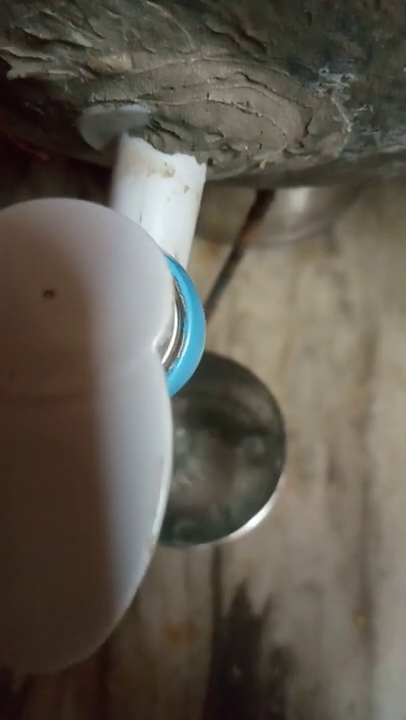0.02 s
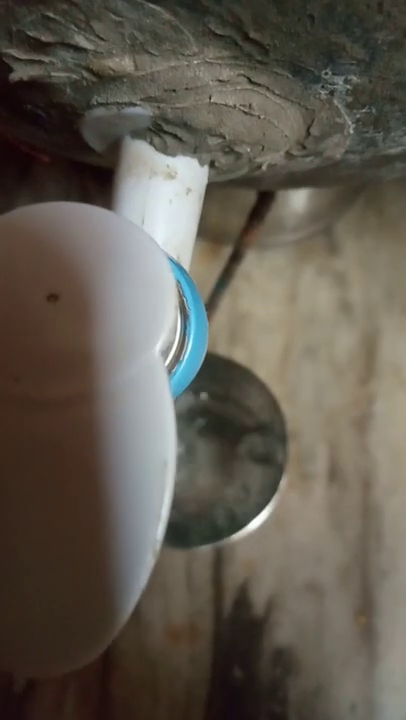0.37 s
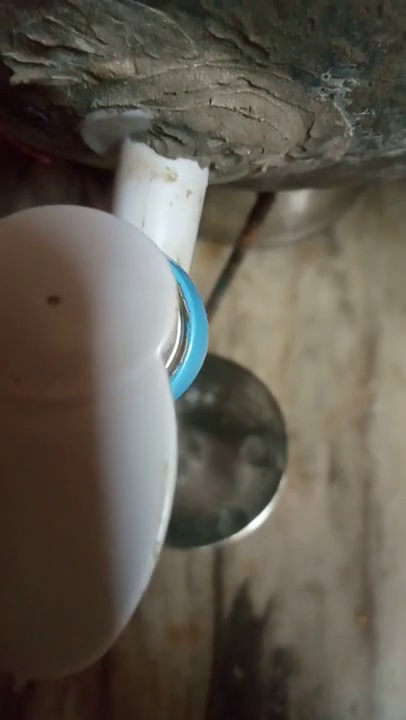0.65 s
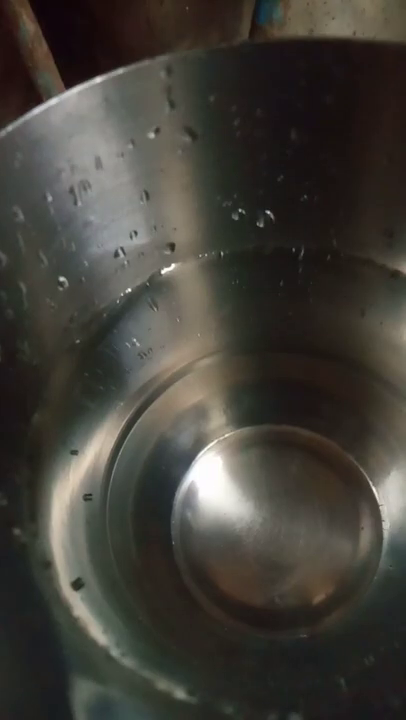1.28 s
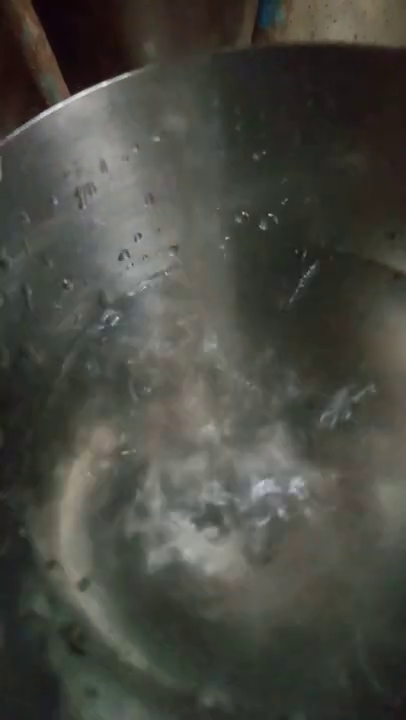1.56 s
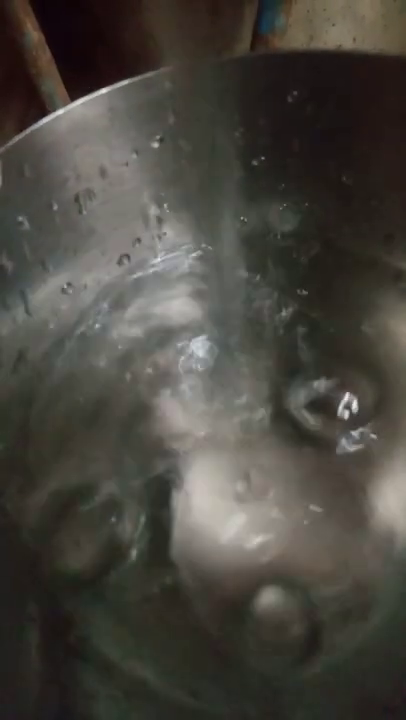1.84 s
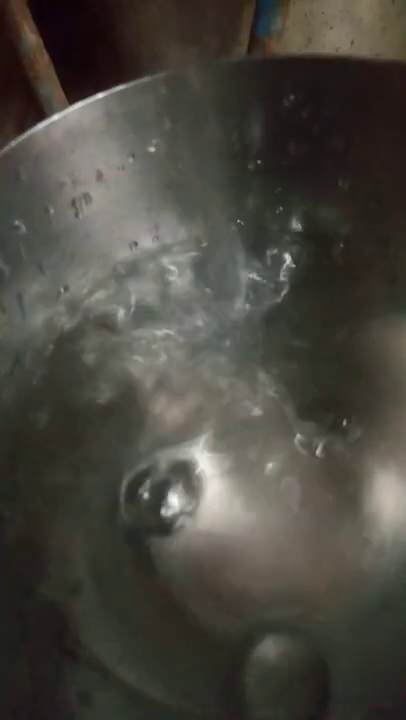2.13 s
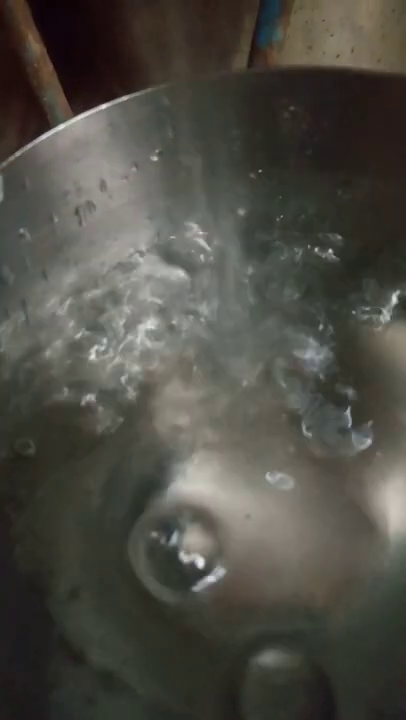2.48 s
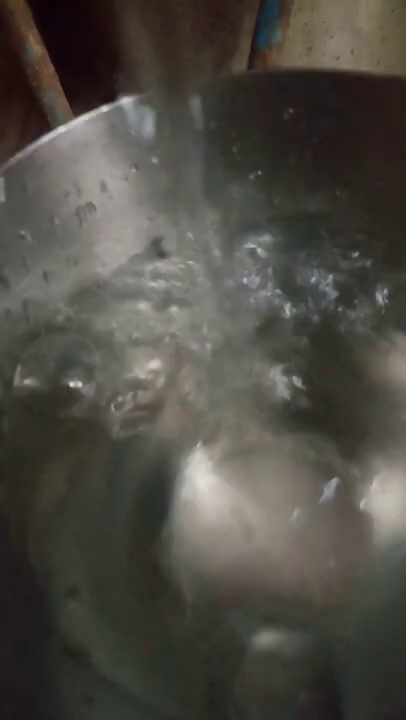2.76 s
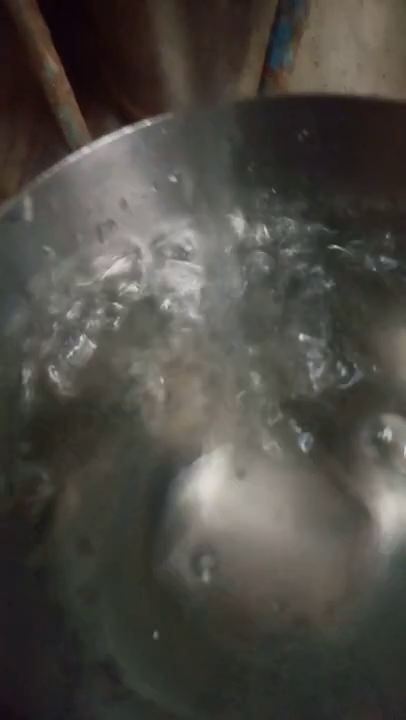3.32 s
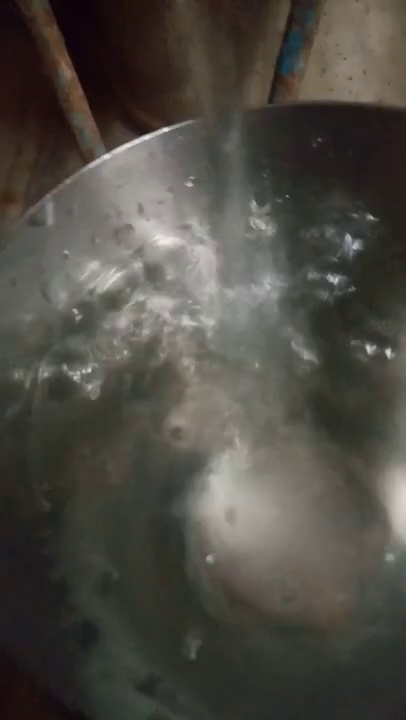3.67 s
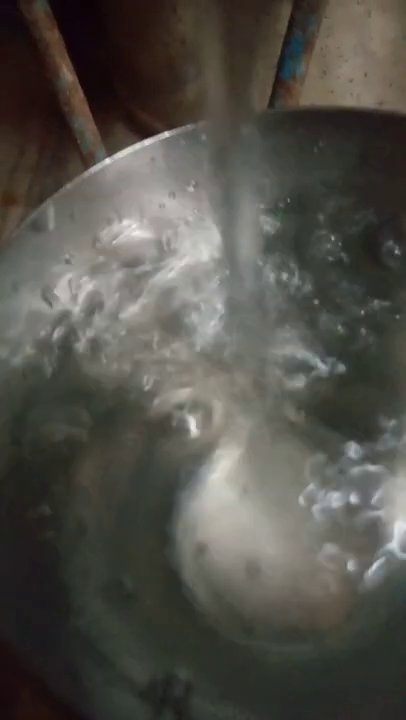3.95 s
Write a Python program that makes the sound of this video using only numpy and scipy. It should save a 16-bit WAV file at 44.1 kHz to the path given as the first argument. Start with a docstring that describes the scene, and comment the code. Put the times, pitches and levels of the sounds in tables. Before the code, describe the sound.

Close by, a stream of water fills a metal cup with a bright, bubbly sound, cuts off for an instant, then plunges into a larger metal pot, where it rumbles hollowly with plinks, gulps and ticking drops.

```python
"""Tap water filling steel vessels

Water runs from a filter tap into a steel tumbler; after an abrupt cut, it pours into a wide steel pot.
The jet drags under a swarm of air bubbles that ring briefly and rise in pitch, and each vessel
colours them with its resonances. Single bubbles plink above the churn, big air pockets gulp,
lumps of water slap, and flung drops tick on the steel over a fine spray."""
import sys
import numpy as np
from scipy import signal
from scipy.fft import rfft, irfft
from scipy.io import wavfile
from scipy.ndimage import uniform_filter1d, map_coordinates

SR = 44100
rng = np.random.default_rng(int(sys.argv[2]) if len(sys.argv) > 2 else 0)


def to_wav(sig):
    """Store sig (one row per channel, or 1-D mono) as 16-bit WAV at the path in sys.argv[1].

    Samples outside -1..1 are clipped; the rate is SR.
    """
    pcm = np.clip(np.atleast_2d(sig), -1, 1) * 32767
    pcm = np.round(pcm).astype(np.int16)
    wavfile.write(sys.argv[1], SR, pcm.T)  # frames by channels


N = 176400  # 4 seconds

# tone of the churning water in each vessel, and a further softening of its top hiss (f/Hz, gain/dB)
TUMBLER_COLOUR = [(25, -31.5), (55, -8.5), (110, -5.5), (200, -3), (450, -2.5), (750, -1), (1050, -5),
                  (1350, -1.5), (1700, -4), (2400, -11), (3100, -16), (3950, -18), (4800, -30), (5400, -43),
                  (7100, -40.5), (8500, -60)]
POT_COLOUR = [(25, -30), (55, -9), (110, -2.5), (220, -5), (400, 0.5), (600, -2.5), (1100, -9.5),
              (1500, -7.5), (2000, -10.5), (2450, -14.5), (2900, -18), (3950, -24.5), (4900, -34.5),
              (5400, -46), (7100, -50), (8500, -65)]
HISS_ROLLOFF = [(8500, 0), (15000, -3)]
# resonances: the pitches at which each vessel and its air like to ring (f/Hz, width/Hz, gain/dB)
TUMBLER_MODES = [(114, 17, 4), (182.5, 25, 1), (280.7, 7.9, 8), (389, 4.8, 10.5), (491, 15, 0),
                 (774, 24, -6), (840, 9, -6.5), (913, 19, 5), (1220, 58, -3), (1345, 20, -5),
                 (1400, 30, 1.5), (1580, 21, 0), (1630, 16, -3.5), (1930, 15, -9), (2083, 45, -2),
                 (3370, 100, -10)]
POT_MODES = [(110, 6.3, -3), (188.7, 18.6, 0.5), (281.2, 13.4, 7.5), (342, 21, -2.5), (390.8, 5.2, 10),
             (428.5, 5.7, 0.5), (642, 38, -9), (883, 61, -2), (1380, 65, -13), (1480, 23, -3.5),
             (1836, 37, -2.5), (2270, 57, -8), (2810, 150, -6), (3330, 89, -4.5), (3910, 78, -6)]
# loudness of the churn in each vessel (t/s, level/dB)
TUMBLER_FLOW = [(0, -29), (.15, -29.5), (.34, -30), (.45, -30), (.6, -28.5), (.8, -31), (1.0, -29.5),
                (1.16, -30.5)]
POT_FLOW = [(1.19, -31), (1.5, -31.5), (1.8, -30.5), (2.1, -31), (2.35, -30), (2.6, -30), (2.9, -31),
            (3.4, -31), (4, -31.5)]
# how the splash in the pot and the fine spray swell and fade (t/s, relative level/dB)
SPLASH_LEVEL = [(1.19, -62), (1.55, -44), (1.75, -36.5), (2.6, -36.5), (2.85, -39), (3.25, -34.5),
                (4, -41.5)]
SPRAY_LEVEL = [(0, -80), (.15, -76), (.3, -75), (.42, -82), (1.15, -85), (1.3, -98), (1.55, -96),
               (1.8, -83.5), (2.3, -87), (4, -86)]
# single bubbles in each vessel, and big air pockets (t/s, f/Hz, relative level/dB, ring time/cycles)
TUMBLER_BUBBLES = [(.046, 1255, -13, 3.1), (.075, 3730, -29, 3), (.080, 1270, -20, 7.5),
                   (.123, 3500, -20, 3.2), (.167, 1515, -17, 6.6), (.243, 3050, -29.5, 4.1),
                   (.247, 1630, -16.5, 3.6), (.273, 3610, -28.5, 7.7), (.289, 3000, -30, 2),
                   (.392, 3820, -28.5, 6.5), (.428, 1395, -18.5, 4), (.429, 3660, -27.5, 3.5),
                   (.458, 2930, -25, 1.8), (.460, 1204, -17.5, 9.3), (.525, 1360, -13.5, 2.9),
                   (.527, 2050, -20, 5), (.529, 1200, -14.5, 14), (.542, 1320, -21, 4.7),
                   (.543, 2028, -14.5, 7.9), (.545, 1570, -13, 7.9), (.565, 1940, -29, 6.8),
                   (.589, 1460, -19.5, 3.9), (.620, 1336, -13.5, 3.2), (.638, 2670, -30, 4.9),
                   (.694, 1260, -18.5, 2.7), (.694, 3370, -31.5, 2.5), (.772, 3800, -35.5, 5),
                   (.808, 3320, -28, 3.6), (.945, 1590, -22, 3.9), (1.009, 2150, -22, 4.6),
                   (1.045, 1660, -17, 3.6), (1.093, 1650, -21, 5.9), (1.141, 3420, -28, 5)]
POT_BUBBLES = [(1.5965, 1330, -7, 1.7), (1.625, 2700, -31.5, 6.4), (1.641, 2500, -21.5, 2.4),
               (1.700, 2930, -30, 2.7), (1.709, 786, -16.5, 2.5), (1.744, 2070, -20, 5.7),
               (1.846, 2790, -27, 7.6), (1.850, 3140, -22.5, 8.3), (1.866, 3310, -33.5, 3.5),
               (1.928, 1570, -16, 3.6), (1.941, 1640, -12, 1.1), (1.949, 1520, -23, 3),
               (1.998, 1495, -25, 5), (2.038, 1820, -18, 9.9), (2.080, 1820, -23.5, 6),
               (2.142, 2640, -23.5, 7.3), (2.149, 1470, -18, 3.9), (2.210, 1860, -16, 5.3),
               (2.247, 2960, -24.5, 6.7), (2.270, 2800, -31, 4), (2.391, 1870, -20, 6.1),
               (2.549, 1740, -21, 7), (2.570, 2700, -29, 6.5), (2.608, 2000, -18.5, 3.4),
               (2.654, 2930, -28.5, 5.5), (2.707, 2730, -31, 5.6), (2.742, 3300, -34, 6.7),
               (2.941, 1720, -23, 10), (2.995, 3510, -25.5, 7.2), (3.048, 2900, -29, 4),
               (3.078, 2680, -24.5, 8.5), (3.165, 1650, -20.5, 3.5), (3.166, 3700, -34, 6.8),
               (3.224, 2650, -28, 4.6), (3.244, 3200, -29, 5.5), (3.261, 1880, -21, 2),
               (3.549, 2120, -18.5, 7), (3.550, 2910, -20, 5.2), (3.557, 3930, -31.5, 6),
               (3.606, 2240, -27, 6), (3.785, 3550, -33.5, 4.1), (3.893, 2650, -19.5, 4.7)]
GULPS = [(.104, 80, -31, 0.8), (.420, 483, -23.5, 2.1), (1.752, 542, -29, 3.5), (1.810, 395, -20.5, 3),
         (1.843, 506, -26, 6.8), (1.941, 412, -25.5, 3.1), (1.955, 514, -31, 5.3), (2.101, 437, -30, 3.4),
         (3.086, 402, -21, 1.2)]
# lumps of water that slap the surface in the pot, and at 2.472 s a drop striking the steel with a bright crack
# near 5 kHz (t/s, centre f/Hz, relative level/dB, length/s)
SLAPS = [(1.598, 2700, -29, 0.0022), (1.641, 2760, -25, 0.0034), (1.700, 2910, -20.5, .005),
         (1.743, 3200, -26.5, 0.0038), (1.846, 3200, -25.5, 0.0048), (1.931, 2200, -29, 0.0022),
         (1.94, 3070, -22, 0.0055), (1.946, 2500, -32, 0.0037), (2.089, 3300, -25.5, 0.0063),
         (2.141, 2550, -31, 0.0061), (2.248, 3170, -33, 0.0028), (2.339, 3770, -28, 0.0027),
         (2.472, 4760, -33, .004), (2.993, 3320, -25, .006), (3.222, 3200, -24.5, 0.0037),
         (3.262, 3150, -19, .003), (3.551, 3100, -30, 0.0076), (3.893, 3020, -26.5, 0.0034)]
# how single bubbles and slaps carry out of the vessel (f/Hz, gain/dB)
BUBBLE_PATH = [(100, -18.5), (4000, 2.5), (5300, -3.5), (7000, -10), (9000, -28), (15000, -34)]
SLAP_PATH = [(500, -6.5), (2000, 1.5), (3950, 0.5), (4500, -9.5), (5100, -19.5), (7000, -18), (9000, -32)]
# drops that hit the steel (t/s, relative crack level/dB, crack f/Hz, relative sizzle level/dB)
TICKS = [(.076, -49, 8200, -49), (.124, -52, 12500, -51), (.191, -51, 14000, -42), (.277, -63, 7500, -51),
         (.289, -47.5, 14200, -36), (.395, -67, 9000, -57), (.428, -62.5, 13500, -60),
         (.458, -62, 13000, -49), (0.559, -59, 14000, -51), (.623, -59, 11500, -45),
         (.694, -60, 13500, -46.5), (.877, -58, 14000, -64), (.966, -60, 13000, -64),
         (1.06, -63, 8000, -47), (1.624, -67, 7800, -48), (1.846, -65, 14000, -56), (1.865, -64, 9000, -59),
         (1.942, -57, 13500, -58), (2.095, -73, 7500, -52), (2.247, -67, 14000, -68),
         (2.473, -73, 7500, -58), (2.70, -65, 13000, -65), (2.739, -64, 13000, -46),
         (2.836, -67, 8000, -59), (2.88, -67, 13800, -57), (2.93, -46.5, 11500, -54),
         (2.997, -62, 8000, -48), (3.136, -66, 13800, -69), (3.262, -63, 13500, -49.5),
         (3.43, -62, 11500, -67), (3.559, -65, 12500, -49), (3.785, -62, 10500, -66),
         (3.893, -76, 7500, -37), (3.964, -66, 7500, -55)]
# high resonances of the steel wall (f/Hz, width/Hz, gain/dB)
STEEL_MODES = [(4940, 160, 1.5), (5150, 87, 6.5), (5950, 70, 6.5), (6234, 60, 5), (6659, 37, 2.5),
               (6900, 49, 3.5)]
# tone of a bubble's snap, the splash, a drop's crack, its sizzle and the spray (f/Hz, gain/dB)
SNAP_COLOUR = [(400, -9.5), (1500, 4.5), (4000, -2.5), (5100, -30), (7000, -29), (9000, -44.5)]
SPLASH_COLOUR = [(700, 3.5), (2000, -9.5), (3600, -10), (5300, -31.5), (7000, -30), (9000, -44.5)]
CRACK_COLOUR = [(2000, -19.5), (4500, -9.5), (5700, -6.5), (7400, 4.5), (8900, -11.5), (11500, -10),
                (14200, -8.5), (15600, -15)]
SIZZLE_COLOUR = [(2500, -7.5), (4700, 0), (5600, -5), (6700, 0), (7400, -9.5), (8800, -34.5)]
SPRAY_COLOUR = [(4000, 1), (7400, 5.5), (8900, -6.5), (11500, -4), (14200, -3), (15600, -12)]


def tumbler():
    """The jet churns in a narrow cup, which rings brightly."""
    fizz = swarm(count=9000, low_hz=250, high_hz=7980, cycles=3.4, rise=0.046, scatter_db=2.5)
    water = churn(fizz, TUMBLER_COLOUR, TUMBLER_MODES, hiss_db=5, flicker_db=0.88, flicker_hz=39.8)
    singles = vessel(plinks(TUMBLER_BUBBLES, rise=0.01, onset=0.55), TUMBLER_MODES)
    return water * curve(TUMBLER_FLOW) + undb(-1.5) * walls(singles, echo_s=0.13, echo_db=-4.5)


def pot():
    """The jet plunges into a wide pot: a hollow rumble, with small bubbles splashing on top."""
    fizz = swarm(count=18000, low_hz=181.1, high_hz=8060, cycles=3.48, rise=0.062, scatter_db=2)
    water = churn(fizz, POT_COLOUR, POT_MODES, hiss_db=2.5, flicker_db=0.71, flicker_hz=70)
    splash = swarm(count=600, low_hz=907, high_hz=3900, cycles=3, rise=0.063, scatter_db=5)
    splash = unit(colour(splash, SPLASH_COLOUR)) * curve(SPLASH_LEVEL)
    singles = vessel(plinks(POT_BUBBLES, rise=0.037, onset=0.58), POT_MODES)
    surface = undb(-3.5) * singles + undb(-9.5) * splash + slaps()
    return water * curve(POT_FLOW) + walls(surface, echo_s=0.1, echo_db=-7.5)


def churn(fizz, tone, modes, hiss_db, flicker_db, flicker_hz):
    """Bubbles and hiss blend into a slightly flickering rush that makes the vessel ring."""
    hiss = undb(hiss_db) * unit(rng.standard_normal(N))
    water = (fizz + hiss) * undb(flicker_db * wander(flicker_hz))
    water = colour(colour(water, tone), HISS_ROLLOFF)
    return unit(vessel(water, modes))


def swarm(count, low_hz, high_hz, cycles, rise, scatter_db):
    """Bubbles of all sizes ring at random times; the smaller the bubble, the higher its note."""
    out = np.zeros(N)
    for when, smallness, chance, ring_time in rng.random((count, 4)):
        hz = low_hz * (high_hz / low_hz) ** smallness
        gain = hz * undb(-scatter_db * np.log(chance + .02))  # high notes are brief, so boost them
        tone = bubble(hz, cycles * 2 ** (2 * ring_time - 1), rise, onset=0.13)
        add(out, when * N / SR, gain * tone)
    return unit(out)


def bubble(hz, cycles, rise, onset):
    """Trapped air rings like a tiny bell and climbs in pitch as it nears the surface."""
    turns = np.arange(int(2 * np.pi * cycles * SR / hz) + 2) * hz / SR
    age = turns / cycles  # each step of 1 fades the ring to 37% and adds rise * hz to its pitch
    shape = (1 - np.exp(-turns / onset)) * np.exp(-age)  # swells over about `onset` cycles
    return shape / shape.max() * np.sin(2 * np.pi * turns * (1 + rise * age / 2))


def plinks(rows, rise, onset):
    """Single loud bubbles snap as they pinch off, then ring, wavering as their shape changes."""
    snap_s, snap_db = 0.0016, -19
    rings, snaps = np.zeros((2, N))
    t = np.arange(SR // 50) / SR
    waver = 0.028 * wander(900)  # about 3% of the pitch
    for start, hz, db, cycles in rows:
        tone = bubble(hz, cycles, rise, onset)
        position = np.cumsum(1 + waver[int(start * SR):][:len(tone)])  # step through it unevenly
        add(rings, start, undb(db) * map_coordinates(tone, [position]))
        add(snaps, start, undb(db + snap_db) * np.exp(-t / snap_s) * rng.standard_normal(len(t)))
    return colour(rings, BUBBLE_PATH) + colour(snaps, SNAP_COLOUR)


def slaps():
    """Each burst is a handful of tiny bubbles ringing almost at once: a broad, wet crack."""
    bubble_count, spread_octaves = 14, 0.94
    out = np.zeros(N)
    for start, centre_hz, db, length_s in SLAPS:
        burst = np.zeros(SR // 20)
        for when, smallness, strength in rng.random((bubble_count, 3)):
            hz = centre_hz * 2 ** (spread_octaves * (smallness - .5))
            tone = bubble(hz, cycles=1.3, rise=0.072, onset=0.26)
            add(burst, length_s * when ** 2, (2 * strength - 1) * tone)
        add(out, start, undb(db) * burst / np.abs(burst).max())
    return colour(out, SLAP_PATH)


def gulps():
    """Big air pockets swell, ring low and rise in pitch."""
    out = np.zeros(N)
    for start, hz, db, cycles in GULPS:
        add(out, start, undb(db) * bubble(hz, cycles, rise=0.047, onset=0.81))
    return out


def ticks():
    """Flung drops hit the steel: a tiny pitched crack, then a wet sizzle that rings the wall."""
    sharpness, pitch_db = 4.5, 3.5  # how clearly a crack's pitch stands out
    cracks, sizzle = np.zeros((2, N))
    crack_shape = drop_shape(decay_s=0.0045, tail_s=0.036, tail_db=-16.5)
    sizzle_shape = drop_shape(decay_s=0.0056, tail_s=0.057, tail_db=-13.5)
    for start, crack_db, hz, sizzle_db in TICKS:
        crack_noise, sizzle_noise = rng.standard_normal((2, len(crack_shape)))
        crack = vessel(crack_shape * crack_noise, [(hz, hz / sharpness, pitch_db)])
        add(cracks, start, undb(crack_db) * crack)
        add(sizzle, start, undb(sizzle_db) * sizzle_shape * sizzle_noise)
    grain = undb(2.5 * wander(600))  # the mist after a drop is uneven
    sizzle = colour(sizzle * grain, SIZZLE_COLOUR)
    return colour(cracks * grain, CRACK_COLOUR) + sizzle + undb(0.5) * ring(sizzle, STEEL_MODES)


def drop_shape(decay_s, tail_s, tail_db, attack_s=0.00089):
    """Loudness of a drop's hit: it jumps up, falls fast and leaves a soft tail."""
    t = np.arange(SR // 4) / SR
    attack = 1 - np.exp(-t / attack_s)
    return attack * (np.exp(-t / decay_s) + undb(tail_db) * np.exp(-t / tail_s))


def spray():
    """Fine droplets patter softly, each at its own pitch."""
    drops = swarm(count=1100, low_hz=5600, high_hz=15000, cycles=6, rise=.02, scatter_db=3.5)
    patter = walls(colour(drops, SPRAY_COLOUR), echo_s=.06, echo_db=0.5)
    return unit(patter) * curve(SPRAY_LEVEL)


def vessel(x, modes):
    """The vessel rings along with whatever sounds in it."""
    return x + ring(x, modes)


def ring(x, modes):
    """Each resonance picks a narrow band of pitches out of x and rings with it."""
    return sum(undb(db) * signal.lfilter(*signal.iirpeak(hz, hz / width, fs=SR), x)
               for hz, width, db in modes)


def walls(x, echo_s, echo_db):
    """Sound bounces between the steel walls; the echoes fade by 60 dB in `echo_s`."""
    t = np.arange(SR // 4) / SR
    echoes = rng.standard_normal(len(t)) * undb(-60 * t / echo_s) * (t > .003)
    return x + undb(echo_db) * signal.fftconvolve(x, echoes / np.linalg.norm(echoes))[:N]


def colour(x, points):
    """Turn lows and highs up or down along (f/Hz, gain/dB) points."""
    size = 8192
    hz, db = np.array(points).T
    log_hz = np.log(np.fft.rfftfreq(size, 1 / SR) + 1)
    gain = undb(np.interp(log_hz, np.log(hz), db))
    cepstrum = irfft(np.log(gain))
    # fold it onto its first half, so the filter never rings before the sound arrives
    cepstrum[1:size // 2] *= 2
    cepstrum[size // 2 + 1:] = 0
    return signal.fftconvolve(x, irfft(np.exp(rfft(cepstrum))))[:N]


def wander(rate_hz):
    """Smooth random drift around zero, with a spread near 1."""
    hold = max(int(SR / rate_hz), 2)
    steps = rng.standard_normal(N // hold + 1)[np.arange(N) // hold]
    return unit(uniform_filter1d(steps, hold))


def curve(rows):
    """A volume that follows (t/s, level/dB) points."""
    return undb(np.interp(np.arange(N) / SR, *np.array(rows).T))


def add(out, start_s, x):
    """Mix a short sound in at its time."""
    i = int(np.clip(start_s * SR, 0, N - 1))
    out[i:i + len(x)] += x[:N - i]


def undb(db):
    """Turn decibels into a number to multiply by."""
    return 10 ** (np.asarray(db) / 20)


def unit(x):
    """Scale to an average (rms) level of 1."""
    return x / np.sqrt(np.mean(x ** 2))


def scene():
    """First the tumbler, an abrupt cut to a moment of silence, then the pot."""
    tumbler_ends_s, fade_out_s = 1.161, .008
    pot_starts_s, fade_in_s = 1.187, .00002
    t = np.arange(N) / SR
    tumbler_on = np.clip((tumbler_ends_s - t) / fade_out_s, 0, 1)
    pot_on = np.clip((t - pot_starts_s) / fade_in_s, 0, 1)
    pour = tumbler_on * tumbler() + pot_on * pot()
    small_sounds = (tumbler_on + pot_on) * (ticks() + spray() + gulps())
    return (pour + small_sounds)[None]


def record(dry):
    """The very highest treble is cut away."""
    top_hz = 15650
    return signal.sosfilt(signal.ellip(8, .2, 70, top_hz, fs=SR, output="sos"), dry)


dry = scene()
out = record(dry)
to_wav(out)
```